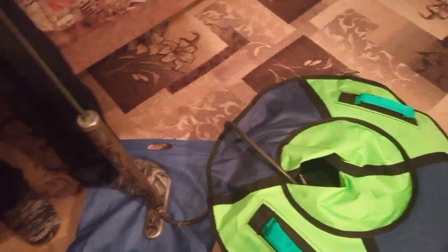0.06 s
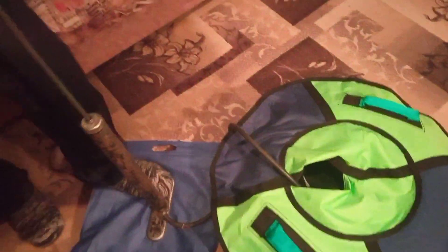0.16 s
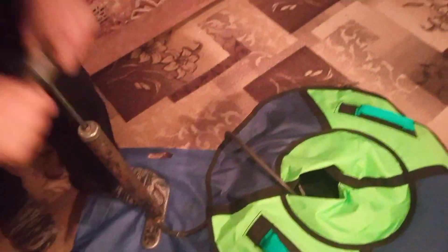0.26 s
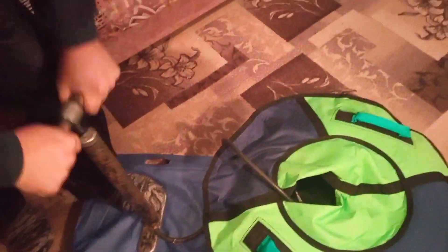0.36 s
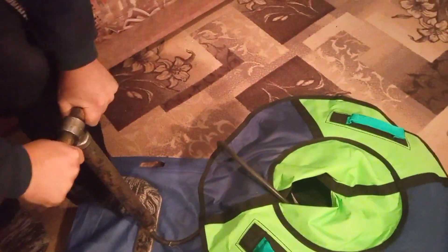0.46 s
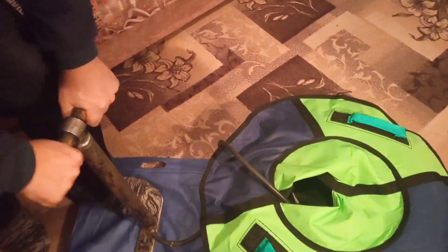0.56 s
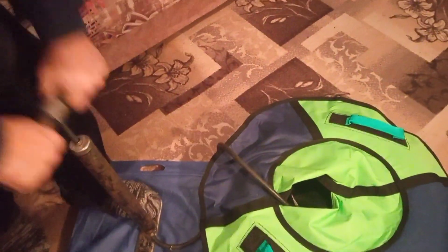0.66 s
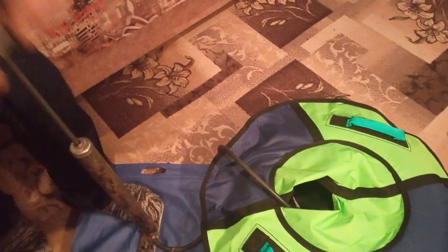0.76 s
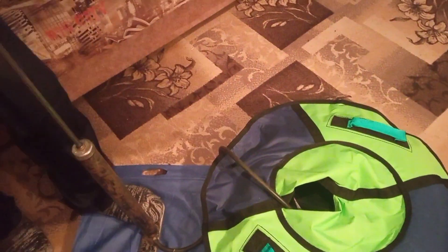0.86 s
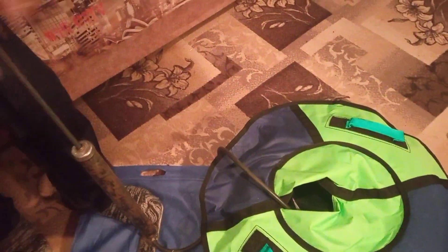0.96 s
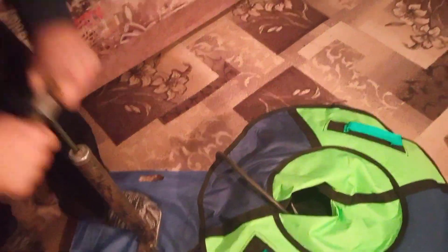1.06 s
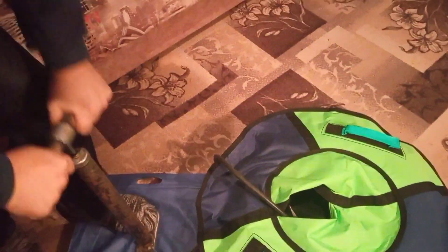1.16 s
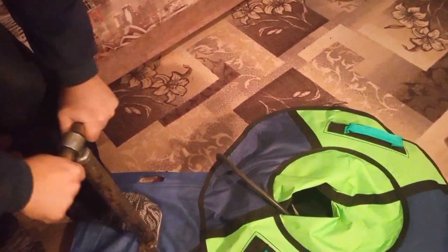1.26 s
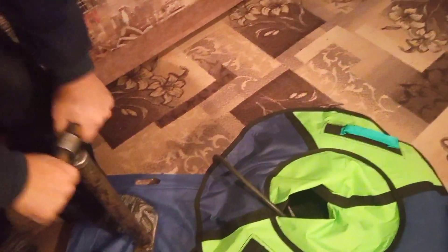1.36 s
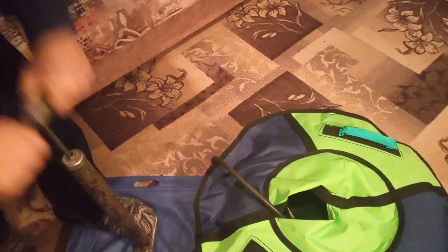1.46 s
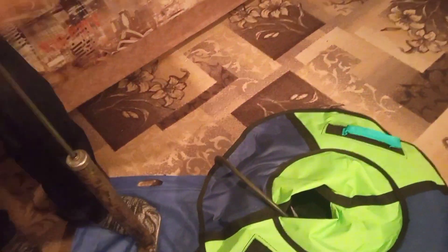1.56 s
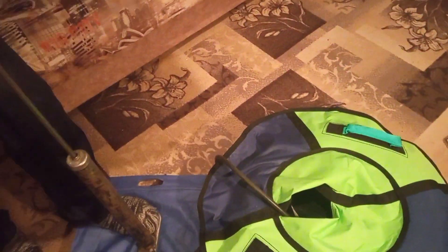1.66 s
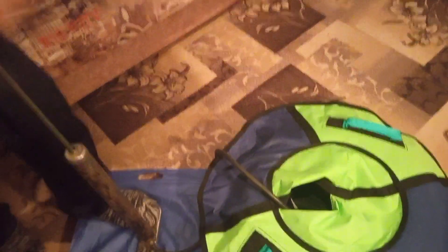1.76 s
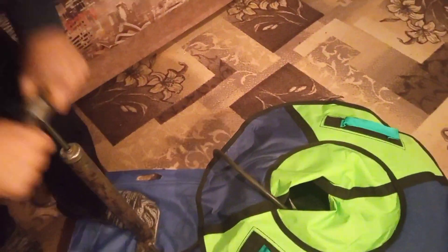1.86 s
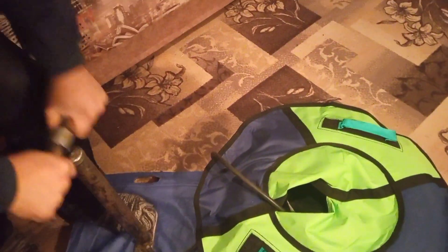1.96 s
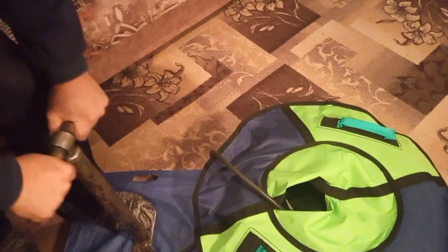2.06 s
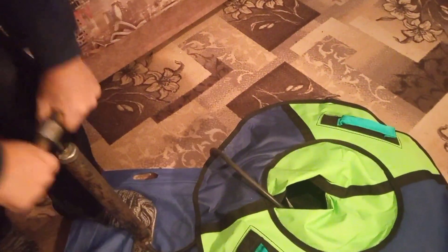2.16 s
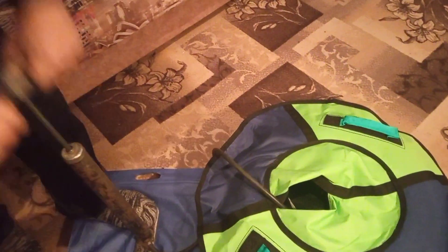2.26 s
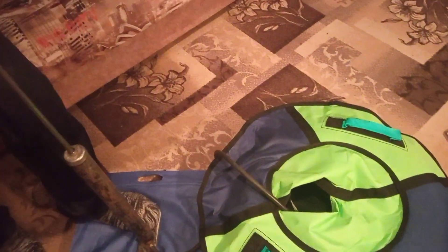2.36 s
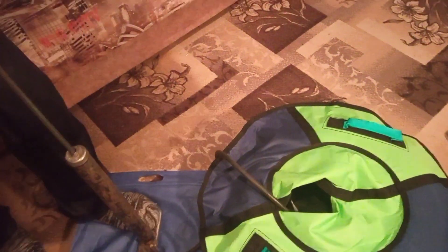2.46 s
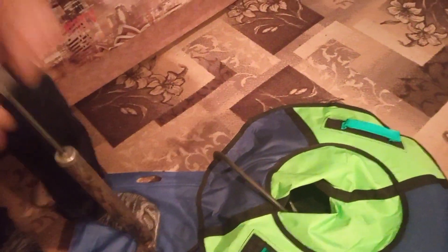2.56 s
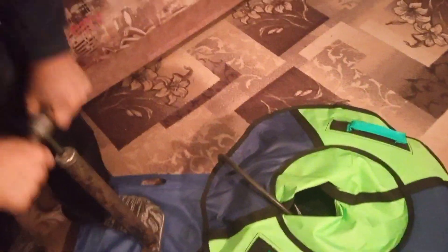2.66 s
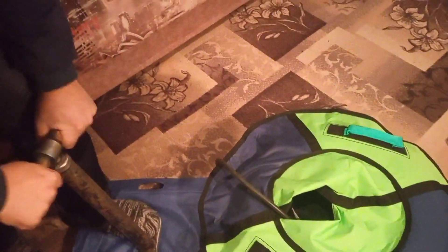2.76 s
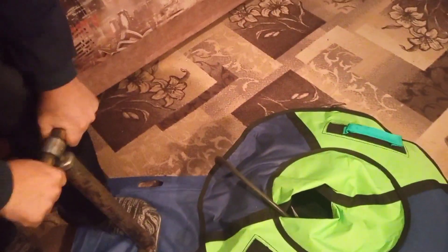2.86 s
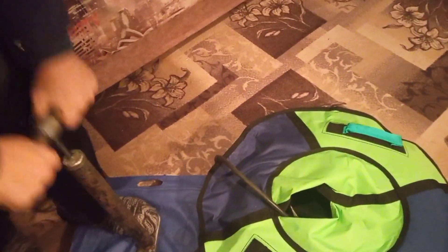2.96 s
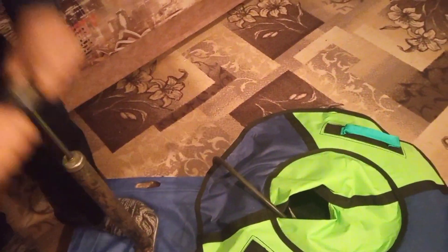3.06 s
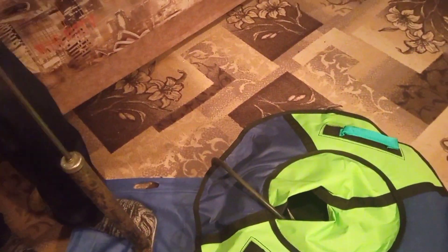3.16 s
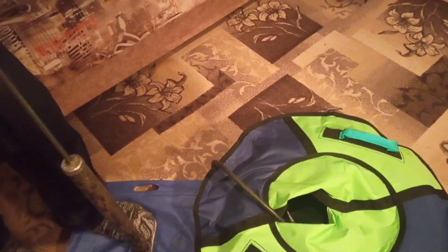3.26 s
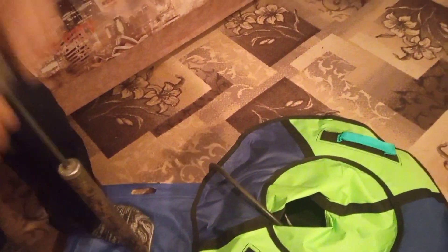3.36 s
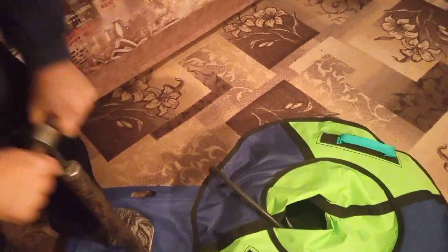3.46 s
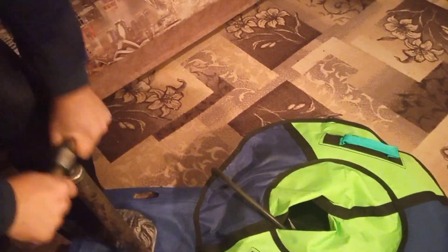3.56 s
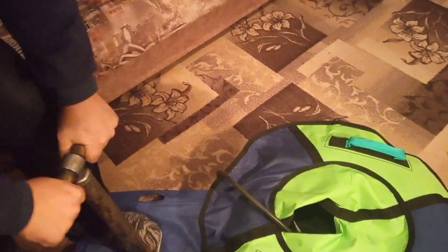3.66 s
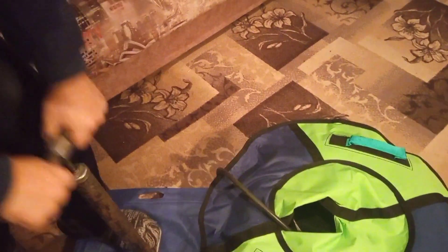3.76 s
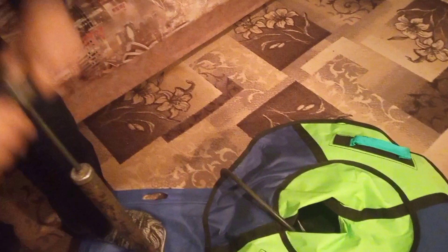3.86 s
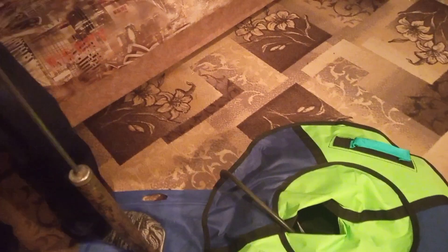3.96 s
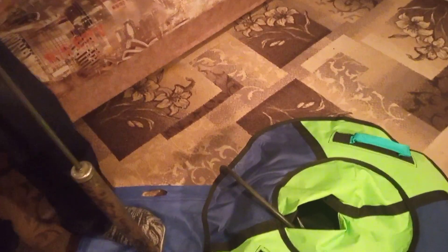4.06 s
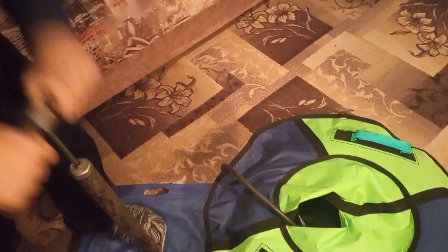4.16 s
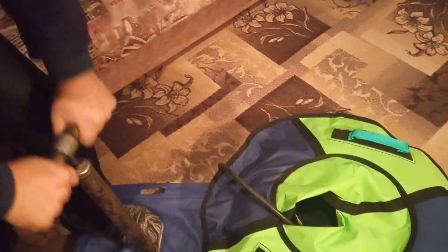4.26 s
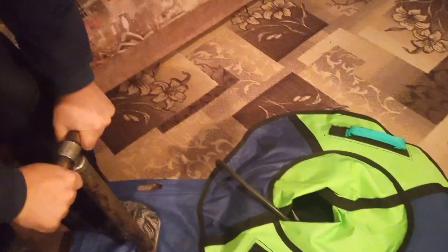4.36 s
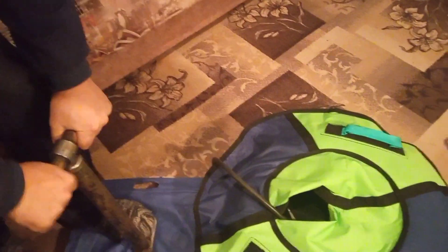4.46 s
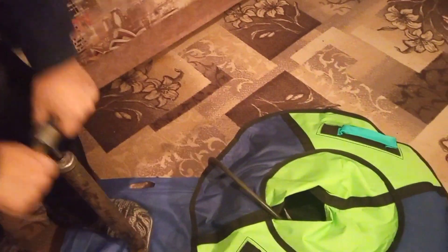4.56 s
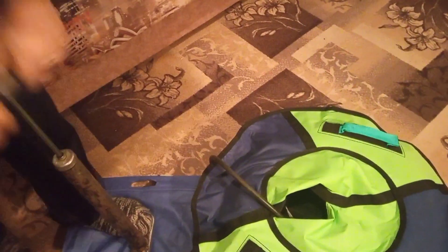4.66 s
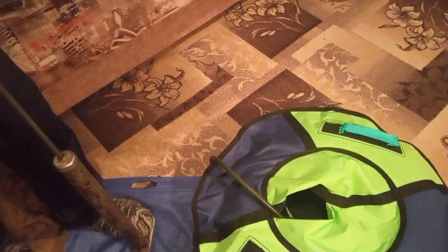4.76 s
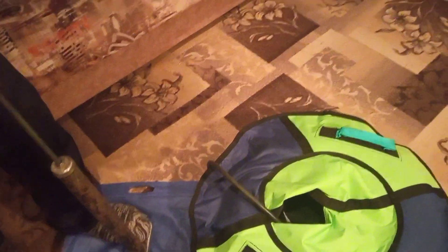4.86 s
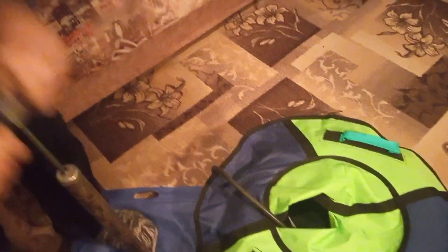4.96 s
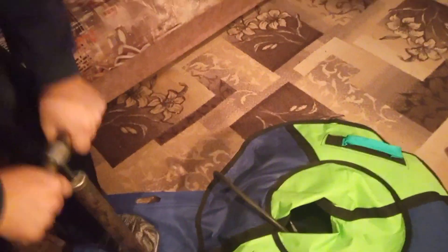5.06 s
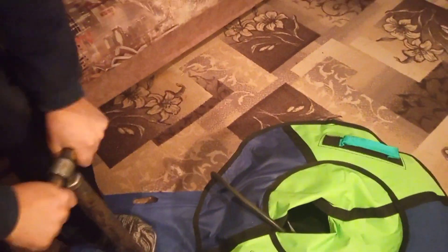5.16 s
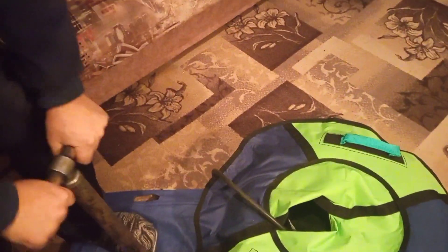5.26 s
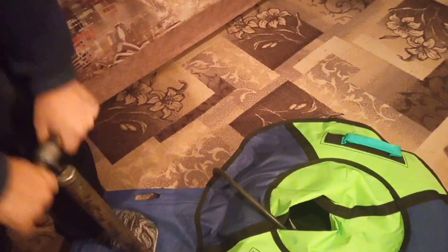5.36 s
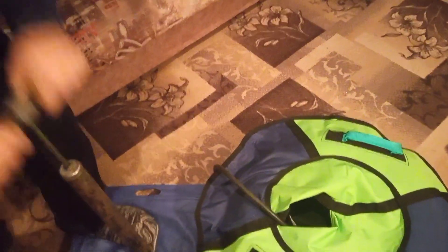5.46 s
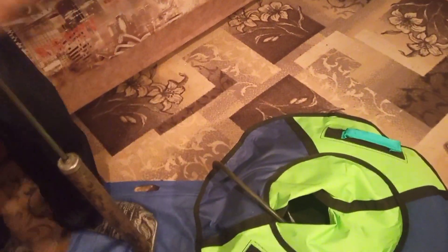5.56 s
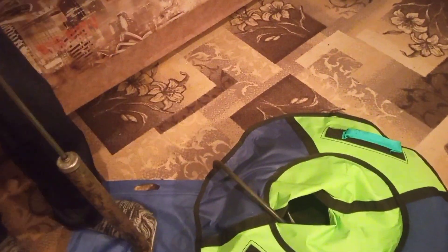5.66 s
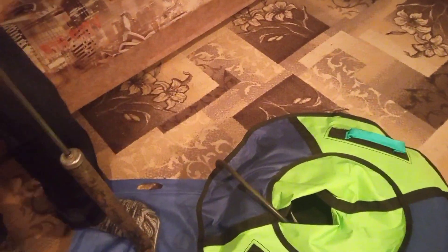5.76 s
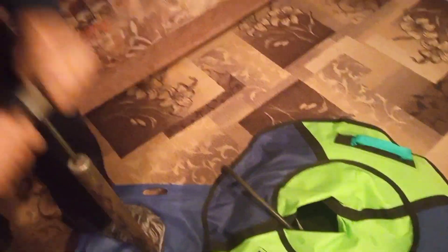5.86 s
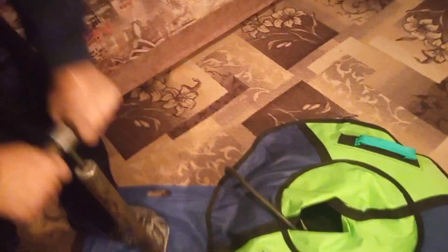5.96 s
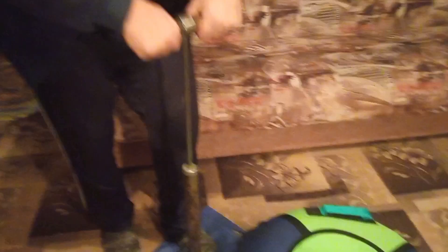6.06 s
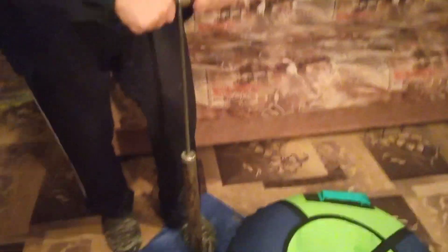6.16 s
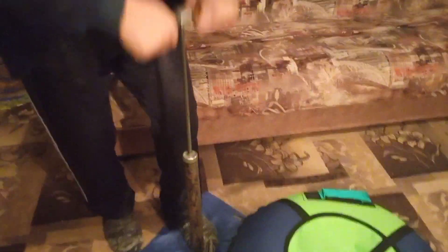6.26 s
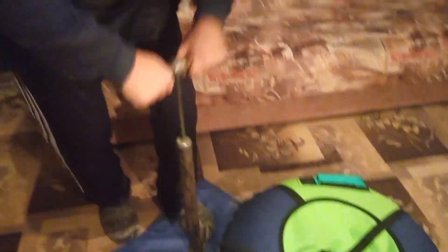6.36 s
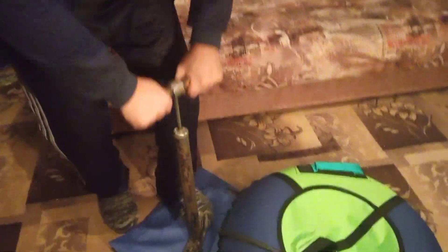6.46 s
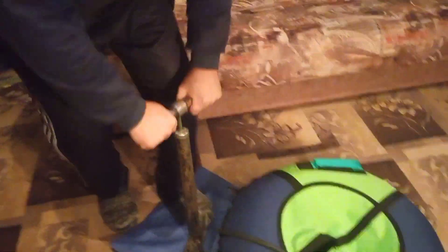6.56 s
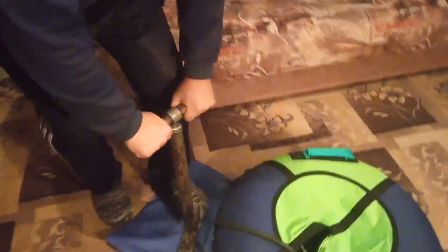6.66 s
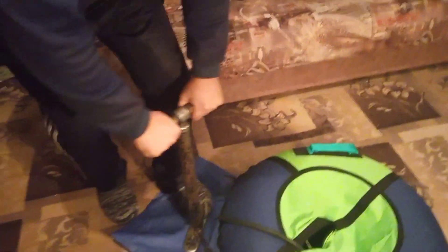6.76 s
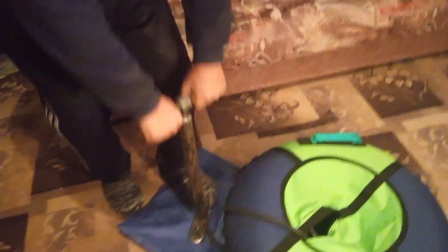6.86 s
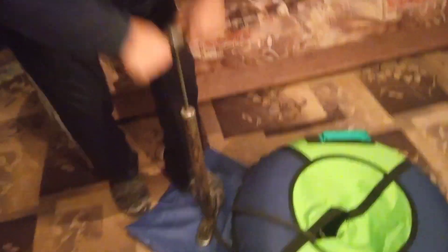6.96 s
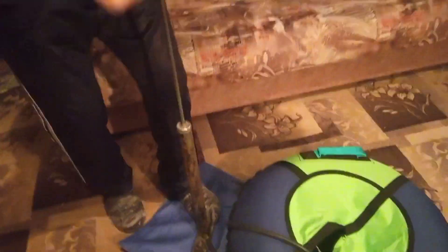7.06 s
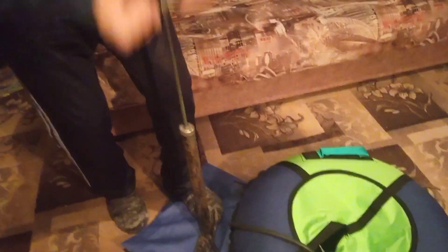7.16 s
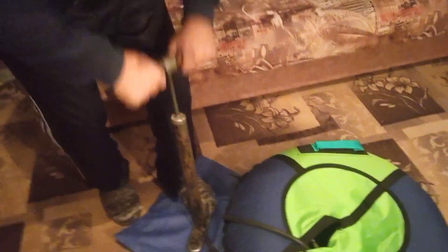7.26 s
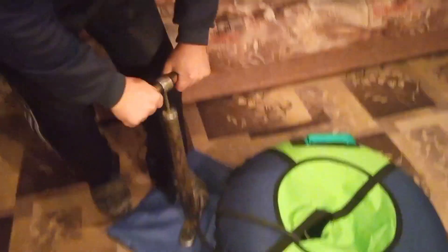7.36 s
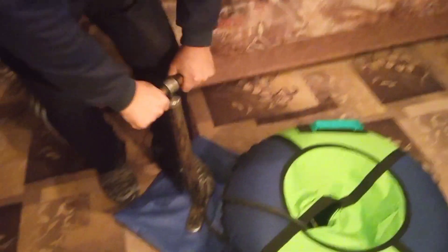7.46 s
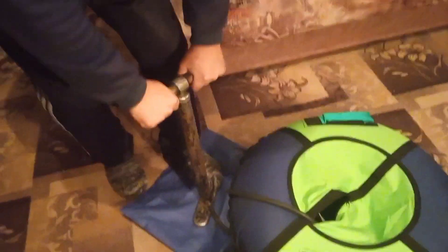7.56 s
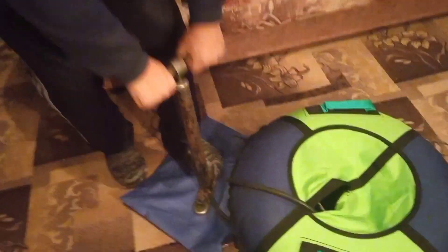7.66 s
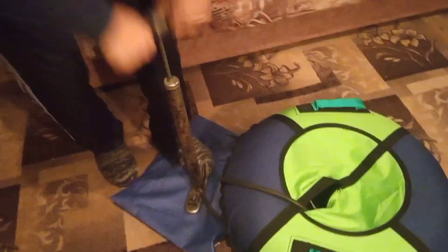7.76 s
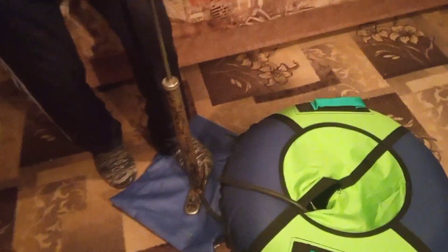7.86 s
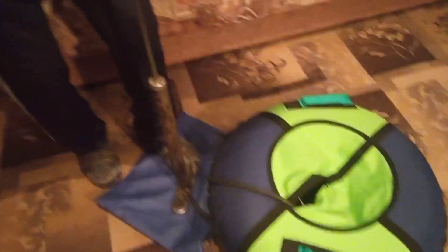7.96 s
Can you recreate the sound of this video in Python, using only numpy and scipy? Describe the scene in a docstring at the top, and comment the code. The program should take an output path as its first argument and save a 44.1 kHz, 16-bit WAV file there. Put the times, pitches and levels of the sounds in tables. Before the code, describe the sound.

A metal floor pump worked in steady strokes indoors, wheezy air rushing, rod clacking, dry seal squeaking, each push landing with a low thud.

```python
"""A steel floor pump inflates a snow tube in a carpeted room, ten strokes at a nearly even pace.
Air, as shaped noise, rushes through the barrel from the start, while the sliding piston rumbles.
The loose rod clacks in its cap: short bursts of noise that ring the barrel. Then the dry seal rasps, as
chopped noise, and squeaks, as unsteady high tones. Each push ends in a thud of fading low tones and noise.
These sounds return stroke after stroke over a quiet background."""
import sys
import numpy as np
from scipy import signal
from scipy.fft import rfft, irfft
from scipy.io import wavfile

SR = 44100
rng = np.random.default_rng(int(sys.argv[2]) if len(sys.argv) > 2 else 0)


def store_pcm(level_fs):
    """Save levels as 16-bit WAV."""
    pcm = np.round(np.clip(level_fs, -1, 1) * 32767).astype(np.int16)
    wavfile.write(sys.argv[1], SR, np.atleast_2d(pcm).T)


N = 354123  # length in samples, about 8 seconds

# All dB columns are relative levels: each sound is balanced once more where it is made.

# Up strokes, drawing air in. Each row: start in seconds, length in seconds, rush in dB, hiss in dB,
# rumble in dB.
UP_STROKES = [(-.15, 0.45, -42.5, -56.5, -56), (0.64, 0.47, -49, -57, -60), (1.437, 0.47, -47, -70, -64),
              (2.18, 0.45, -43, -53.5, -55.5), (2.99, 0.43, -43.5, -65, -55.5),
              (3.738, 0.62, -46.5, -62, -54.5), (4.48, 0.52, -45.5, -60, -77), (5.29, 0.48, -53, -62, -75),
              (6.805, 0.47, -42, -62, -49.5), (7.715, 0.41, -43.5, -59, -57.5)]
# Down strokes, each ending in a thud. Each row: landing time in seconds, push length in seconds,
# rush in dB, hiss in dB, rumble in dB, boom in dB, knock in dB, clank in dB.
DOWN_STROKES = [(0.539, .38, -47, -49, -52.5, -9.5, -24.5, -21.5),
                (1.356, 0.38, -44, -44.5, -49.5, -13, -31.5, -23.5),
                (2.097, 0.36, -44.5, -45.5, -49.5, -15, -37.5, -28),
                (2.879, 0.46, -48, -46, -52, -17.5, -32.5, -25),
                (3.668, 0.37, -43, -46.5, -52, -10.5, -23, -23.5),
                (4.456, 0.39, -42, -45, -52, -12, -29.5, -40),
                (5.256, 0.36, -45, -47, -51.5, -11.5, -26, -26),
                (6.01, 0.19, -59.5, -69, -62, -28, -42.5, -24.5),
                (6.712, 0.43, -50.5, -50.5, -56, -14.5, -25.5, -22),
                (7.57, 0.47, -42, -46.5, -53.5, -18.5, -31, -28.5)]
# How each sound swells within a stroke. Each holds: loudest point as a share of the stroke,
# sag by the end in dB, time constant of the dying away in seconds.
PUSH_RUSH = (0.29, 9.3, 0.14)  # air rushes while the piston runs freely
PUSH_HISS = (0.86, 5, 0.11)  # it hisses past the seal as pressure builds
PUSH_RUMBLE = (.7, 0.5, 0.032)  # the barrel shakes most under full load
LIFT_AIR = (0.43, 12, 0.035)
LIFT_RUMBLE = (0.16, 9.3, 0.05)
# Rod and valve clacks. Each row: start in seconds, crack level in dB, barrel ring in dB.
CLACKS = [(0.0194, -31, -22.5), (0.1086, -24, -34), (0.199, -36.5, -26), (0.8215, -30.5, -18),
          (.956, -23.5, -30.5), (1.4503, -32, -23), (1.6136, -32.5, -31), (1.7445, -25.5, -30),
          (1.961, -26.5, -48), (2.4231, -27, -22), (2.503, -24.5, -33), (3.114, -22, -19),
          (3.194, -40, -21), (3.2875, -24, -29.5), (3.4011, -29.5, -33), (3.7879, -26, -20.5),
          (4.0971, -29, -23), (4.1943, -26.5, -38), (4.2458, -24.5, -19.5), (4.668, -33.5, -27.5),
          (4.9185, -36.5, -42), (5.504, -32, -25), (6.3778, -28, -36), (6.859, -47, -25), (7, -35.5, -32),
          (7.1543, -26, -29), (7.224, -32.5, -48), (7.7465, -37.5, -24), (7.987, -34, -56)]
# The seal chatters without a pitch. Each row: start in seconds, length in seconds, swell time in seconds,
# scrape level in dB, hiss in dB.
RASPS = [(.219, 0.11, 0.023, -36, -37), (0.732, 0.14, 0.02, -42, -70), (1.05, 0.076, 0.023, -41.5, -41.5),
         (1.541, 0.095, 0.017, -41, -45.5), (1.791, 0.07, 0.037, -36, -38),
         (2.272, 0.043, 0.0067, -29.5, -26), (2.573, 0.095, 0.023, -36, -51),
         (2.97, .083, 0.0033, -28.5, -34.5), (3.398, 0.09, 0.0057, -40.5, -38.5),
         (3.556, 0.033, .01, -47, -41.5), (4.185, 0.018, 0.061, -16, -58.5),
         (4.358, 0.041, 0.02, -43.5, -51.5), (4.968, 0.092, 0.013, -39, -47),
         (5.108, 0.064, 0.0043, -46.5, -27.5), (7.81, 0.049, 0.016, -43.5, -41.5)]
# Seal squeaks. Each row: start in seconds, length in seconds, basic pitch in Hz, level in dB,
# roughness from 0 to 1.
SQUEAKS = [ (0.363, 0.043, 6590, -34, 0.28), (.436, 0.0098, 6660, -30.5, 0),
           (0.449, 0.066, 10340, -39, 0.3), (0.516, 0.026, 6646, -32, .12),
           (1.183, 0.0088, 6710, -33, 0.03), (1.248, 0.037, 4770, -37.5, 0.45),
           (1.249, 0.016, 6360, -37, 0.69), (1.252, 0.0086, 9300, -29, 0.63),
           (1.271, 0.034, 10160, -40.5, .1), (1.352, 0.0064, 11420, -37.5, 0.17),
           (2, 0.0081, 6860, -41, 0.2), (2.022, 0.012, 10280, -39.5, 0.25),
           (2.023, 0.029, 6640, -34.5, 0.15), (2.028, 0.024, 11620, -37, .05),
           (2.069, 0.039, 6440, -30, 0.26), (2.728, .011, 4790, -39, 0.5), (2.753, 0.026, 6610, -30.5, .2),
           (2.762, 0.049, 6480, -37.5, 0.1), (2.78, 0.013, 11540, -34.5, 0.08),
           (3.557, 0.011, 6230, -27.5, 0.54), (3.563, 0.071, 6090, -32.5, 0.57),
           (3.824, 0.07, 4750, -45.5, 0.28), (4.283, 0.017, 6490, -32, 0.13),
           (4.344, 0.039, 5845, -29, 0.59), (4.396, 0.028, 6290, -29, 0.45),
           (4.439, 0.021, 6467, -26.5, 0.22), (5.125, 0.064, 6330, -34.5, .95),
           (5.241, 0.029, 6450, -40.5, 0.2), (5.424, 0.0087, 4560, -46.5, 0.11),
           (5.838, 0.048, 4630, -42.5, 0.37), (5.882, 0.064, 4600, -40.5, 0.42),
           (5.984, 0.011, 6290, -28.5, 0.51), (6.364, 0.054, 4450, -45.5, 0.44),
           (6.403, 0.022, 6710, -33.5, 0.25), (6.452, 0.0077, 6630, -26.5, 0.16),
           (6.512, 0.014, 6670, -28, 0.18), (6.636, .015, 7390, -40.5, .25),
           (6.687, 0.038, 6583, -29.5, 0.31), (7.349, .028, 6870, -41, 0.16),
           (7.372, 0.039, 11780, -48, 0.16), (7.387, .008, 7230, -25.5, 0.26),
           (7.445, 0.016, 11700, -39.5, .13), (7.457, 0.024, 6850, -33.5, 0),
           (7.473, .024, 6290, -31, 0.34), (7.474, 0.067, 7340, -30.5, 0.06),
           (7.534, 0.011, 11970, -40, .23), (7.548, 0.0385, 6485, -30, 0.01),
           (7.799, 0.037, 4750, -40, 0.11)]

# Resonances of the steel barrel. Each row: pitch in Hz, width in Hz, level in dB.
BARREL = [(1827, 43, -7), (2343, 125, 2), (2420, 106, 1), (2580, 130, 7), (2781, 34, 5), (3178, 170, -2),
          (3512, 148, 0.5), (4130, 25, -1.5), (4330, 57, 4.5), (4800, 27, -2.5), (4840, 190, -13.5),
          (5420, 20, -47)]
# Other modes of the seal's lip, which a rough slip sets off together. Each row: pitch in Hz,
# width in Hz before widening, level in dB.
SEAL_LIP = [(3160, 150, -13), (4690, 170, -5), (5350, 1200, -9), (6620, 270, -2), (7000, 200, -7.5),
            (9500, 780, -10), (10700, 230, -7.5), (11600, 500, -8.5)]
# Modes of the pump standing on the floor, low ones and then higher ones. Each row: basic pitch in Hz,
# level in dB, time to fade by 60 dB in seconds.
BODY = [(92.6, -15, 0.43), (153.3, -9.5, 0.17), (198.2, -11, 0.42), (234.3, -4, 0.27), (285.8, -4.5, 0.24),
        (366, -25, 0.11)]
KNOCK = [(413, -14, 0.19), (484.8, 11.5, 0.2), (548.5, 4, 0.14), (585, 4, 0.18), (660, -0.5, 0.21),
         (730, -49, 0.13)]

# Noise colours. Each row: frequency in Hz, level at that frequency in dB.
RUSH = [(400, 4.5), (700, 8), (1300, 1.5), (2000, 4), (2600, -3.5), (3300, -2.5), (4500, 1.5), (5600, -8),
        (7000, -17), (10000, -48.5), (15000, -41.5)]  # air in the barrel
HISS = [(2650, -9.5), (4500, -4), (5330, -6), (6200, 1), (8140, -7.5), (9270, -2.5), (11200, -13.5),
        (12600, -19.5), (15100, -9.5), (16200, -32), (16500, -68.5)]  # air past the cap and seal
RUMBLE = [(30, -28), (60, -20), (100, -9), (150, -4.5), (230, -0.5), (320, -7), (420, -4), (620, -12),
          (900, -21.5), (1500, -19.5)]  # the sliding piston
TICK = [(1470, -45), (2500, -31), (3350, -16), (4280, 3), (5510, 2.5), (9350, 4), (13000, -7), (15200, -4),
        (16100, -10.5), (16500, -43)]  # bright hits and grit
RASP = [(500, -14), (1000, -9.5), (1400, -9.5), (1900, -4.5), (2500, -8.5), (3300, -3.5), (4500, -6),
        (5600, -6.5), (7000, -11), (9500, -18.5), (13000, -22)]  # the scraping seal
THUMP = [(45, -28.5), (70, -27.5), (95, -10.5), (130, -11), (170, -5.5), (230, -2), (290, -5), (350, -6),
         (600, -19.5)]  # the floor's many weak modes
CLUNK = [(330, -10), (400, 5), (470, -12.5), (600, 2), (760, -1.5), (900, -9.5), (1200, -12.5), (1450, -20),
         (1900, -19)]  # the pump's many weak modes
QUIET = [(18, -83), (30, -34.5), (106, 13.5), (374, -21), (962, -88), (1390, -48.5), (2410, 8), (3490, 4.5),
         (6380, -37), (16000, -45.5)]  # the quiet background

QUIET_DB = -69  # background level
EDDY_DB = 6.5  # how far the eddies push each barrel resonance up and down
GRIT_PER_S, GRIT_DB = 5, 5  # faint ticks of the dry rod; their level against the airflow
SQUEAK_SAG = 0.047  # share of the pitch that a fully rough squeak falls
SQUEAK_WAVER = 0.0056  # slow unsteadiness, as a share of the pitch
SQUEAK_RISE_S, SQUEAK_SLOW_RISE = 0.0025, 0.033  # attack, plus this share of the squeak's length
TOP_HZ = 16300  # nothing much is heard above this


def undb(db):
    """Turn decibels into a gain."""
    return 10 ** (np.asarray(db) / 20)


def unit(x):
    """Scale to an rms level of 1."""
    return x / np.sqrt(np.mean(x ** 2) + 1e-20)


def add(out, s, x):
    """Mix x into out from time s on."""
    i = max(int(s * SR), 0)
    out[i:i + len(x)] += x[:max(len(out) - i, 0)]


def noise(colour, size=N):
    """Noise of rms 1 with the given colour, fading beyond both ends of its table."""
    hz, db = np.transpose(colour)
    f = np.fft.rfftfreq(size, 1 / SR) + 1
    gain = undb(np.interp(np.log(f), np.log(hz), db))
    skirts = np.minimum(f / hz[0], 1) ** 2 * np.minimum(hz[-1] / f, 1) ** 4
    return unit(irfft(rfft(rng.standard_normal(size)) * gain * skirts, size))


def wander(rate, size=N):
    """A smooth random curve of rms 1 that changes about rate times a second."""
    f = np.fft.rfftfreq(size, 1 / SR)
    return unit(irfft(rfft(rng.standard_normal(size)) / (1 + (f / rate) ** 4), size))


def resonate(x, hz, width):
    """One resonance, gain 1 at its centre."""
    return signal.lfilter(*signal.iirpeak(hz, hz / width, SR), x)


def barrel(x):
    """Pass a sound through the resonances of the steel tube."""
    return sum(undb(db) * resonate(x, hz, width) for hz, width, db in BARREL)


def room(x, t60, wet_db):
    """A small furnished room: dense reflections that start 3 ms late and fade by 60 dB in t60 seconds."""
    t = np.arange(SR // 3) / SR
    tail = rng.standard_normal(len(t)) * undb(-60 * t / t60) * (t > .003)
    return x + undb(wet_db) * signal.fftconvolve(x, tail / np.linalg.norm(tail))[:len(x)]


def gate(t, length, rise, fall):
    """A loudness curve that swells, holds until length seconds and dies away."""
    return (1 - np.exp(-(t / rise) ** 2)) * np.exp(-np.maximum(t - length, 0) / fall)


def ring(modes, t):
    """Damped modes, struck a little differently at every blow."""
    out = 0
    for k, (hz, db, t60) in enumerate(modes):
        size_db, detune = rng.standard_normal(2)
        loudness = undb(db + 1.5 * size_db - 60 * t / t60)
        sign = (-1) ** k  # neighbouring modes start in opposite directions
        out = out + sign * loudness * np.sin(2 * np.pi * hz * (1 + .008 * detune) * t)
    return out


def swell(start, length, shape):
    """One stroke's gain: grows to its loudest point, sags to the end of the stroke, then dies away."""
    peak, sag_db, release_s = shape
    peak = np.clip(peak, .05, .95)
    t = np.arange(N) / SR - start
    rise = np.sin(np.pi / 2 * np.clip(t / (peak * length), 0, 1)) ** 1.3
    sag = undb(-sag_db * np.clip((t / length - peak) / (1 - peak), 0, 1))
    return rise * sag * np.exp(-np.maximum(t - length, 0) / release_s)


def pumping(push_shape, lift_shape, axis):
    """Gain through all down and up strokes of the rush (axis 0), hiss (1) or rumble (2)."""
    down = sum(undb(levels[axis]) * swell(lands - length, length, push_shape)
               for lands, length, *levels in DOWN_STROKES)
    up = sum(undb(levels[axis]) * swell(s, length, lift_shape) for s, length, *levels in UP_STROKES)
    return np.hypot(down, up)


def background():
    """A steady, very soft noise lies under everything."""
    return noise(QUIET) * undb(QUIET_DB)


def air():
    """Turbulent rush and hiss through the cap; eddies favour changing barrel resonances; the rod adds grit."""
    t = np.arange(N) / SR
    flow = pumping(PUSH_RUSH, LIFT_AIR, axis=0)
    flutter = undb(1.3 * wander(14) + 1.2 * wander(60) + 1.5 * wander(900))
    rush = noise(RUSH) * flow * undb(-5.5) * flutter
    hiss = noise(HISS) * pumping(PUSH_HISS, LIFT_AIR, axis=1) * undb(1.0) * flutter

    # each resonance gets its own random level curve, about 35 points a second
    eddies = rng.standard_normal((len(BARREL), 280))
    eddy_s = np.linspace(0, t[-1], eddies.shape[1])
    ringing = np.zeros(N)
    for (hz, width, db), eddy in zip(BARREL, eddies):
        eddy_gain = undb(db + EDDY_DB * np.interp(t, eddy_s, eddy))
        ringing += resonate(rush * eddy_gain, hz, width)

    # rare random catches, each fading with a time constant of 2 ms
    starts = 1. * (rng.random(N) < GRIT_PER_S / SR)
    catches = signal.lfilter([1], [1, -np.exp(-1 / (0.002 * SR))], starts)
    grit = noise(TICK) * catches * flow * undb(GRIT_DB)
    return 0.68 * rush + 1.02 * ringing + hiss + grit


def slide():
    """The piston rumbles in the barrel; in each push the air's hollow note grows and rises to the thud."""
    t = np.arange(N) / SR
    judder = undb(2.5 * wander(16))
    rumble = noise(RUMBLE) * judder * undb(0.9)
    # climbs from 0 to 1 in each push, then drops back within 60 ms
    push = sum(np.interp(t - lands, [-length, 0, .06], [0, 1, 0]) for lands, length, *_ in DOWN_STROKES)
    hollow_hz = 215 + 45 * push
    hollow = wander(52) * np.sin(2 * np.pi * np.cumsum(hollow_hz) / SR)
    return (rumble + undb(8) * push * hollow) * pumping(PUSH_RUMBLE, LIFT_RUMBLE, axis=2)


def clacks():
    """The rod hits its cap: a bright crack, a short chatter and the ring of the barrel."""
    out, t = np.zeros(N), np.arange(SR // 4) / SR
    attack = 1 - np.exp(-t / 0.00098)
    for s, db, ring_db in CLACKS:
        crack = noise(TICK, size=len(t)) * (np.exp(-t / 0.0041) + 0.27 * np.exp(-t / 0.0095))
        steel = unit(barrel(rng.standard_normal(len(t)))) * np.exp(-t / 0.014)
        add(out, s, (crack * undb(db - 4.0) + steel * undb(ring_db - 12.5)) * attack)
    return out


def rasps():
    """Irregular slips of the seal chop the air into a coarse scrape that rings the barrel."""
    out, t = np.zeros(N), np.arange(SR // 4) / SR
    for s, length, swell_s, db, hiss_db in RASPS:
        shape = gate(t, length, swell_s, 0.01)
        slips = undb(1.6 * wander(340, size=len(t)) + 3.05 * wander(53, size=len(t))) * shape
        # uneven, but each with the strength its smooth shape sets
        slips = slips * np.linalg.norm(shape) / np.linalg.norm(slips) * undb(-4.5)
        scrape = noise(RASP, size=len(t)) * slips * undb(db)
        scrape = .5 * scrape + 1.8 * barrel(scrape)
        hiss = noise(HISS, size=len(t)) * slips * undb(hiss_db)
        add(out, s, scrape + hiss)
    return out


def squeaks():
    """The seal sticks and slips at a high pitch; when rough, it flaps and rings its other modes too."""
    out, t = np.zeros(N), np.arange(SR // 4) / SR
    for s, length, pitch_hz, db, rough in SQUEAKS:
        # a rough squeak starts sharp and drops as the seal grips
        fall = SQUEAK_SAG * (.5 - np.minimum(t / length, 1)) + 0.13 * np.exp(-t / 0.0053)
        slow_waver = SQUEAK_WAVER * wander(45, size=len(t))
        fast_waver = (0.00067 + 0.03 * rough) * wander(610, size=len(t))
        hz = pitch_hz * (1 + rough * fall) * (1 + slow_waver + fast_waver)
        phase = 2 * np.pi * np.cumsum(hz) / SR

        # flapping varies the loudness fast enough to add side tones
        flap_hz = 1400 * (1 + 0.14 * wander(220, size=len(t)))
        flap = np.sin(2 * np.pi * np.cumsum(flap_hz) / SR)
        octave = undb(-23.5 + 10 * rough) * (pitch_hz < SR / 5)  # only lower squeaks get an octave
        tone = np.sin(phase) * (1 + rough ** 2 * flap)
        tone = tone + octave * np.sin(2 * phase) * (1 + 2 * rough ** 2 * flap)

        slips = rng.standard_normal(len(t))
        lip = np.zeros(len(t))
        for mode_hz, width, mode_db in SEAL_LIP:
            once = resonate(slips, mode_hz, 1.3 * width)
            lip += undb(mode_db) * resonate(once, mode_hz, 1.3 * width)
        leak = noise(HISS, size=len(t))  # air leaks past the flapping lip
        tone = tone + 1.16 * rough ** 2 * unit(lip) + 0.1 * rough * leak

        shape = gate(t, length, SQUEAK_RISE_S + SQUEAK_SLOW_RISE * length, 0.0054)
        grip = undb(2.2 * wander(130, size=len(t)))
        heard = room(tone * shape * grip, t60=0.17, wet_db=-1.5)
        add(out, s, unit(heard) * np.sqrt(np.mean(shape ** 2)) * undb(db + 7.5))
    return out


def thuds():
    """The piston lands: the floor booms, the pump knocks on its foot and the steel clanks."""
    out, t = np.zeros(N), np.arange(SR // 2) / SR
    attack = 1 - np.exp(-t / 0.0034)
    weak = np.exp(-t / 0.045)
    for s, *_, boom_db, knock_db, clank_db in DOWN_STROKES:
        # a few strong modes join many weak ones, which are heard as noise
        boom = .29 * ring(BODY, t) + .24 * noise(THUMP, size=len(t)) * weak
        knock = 0.27 * ring(KNOCK, t) + 0.63 * noise(CLUNK, size=len(t)) * weak
        clank = unit(barrel(rng.standard_normal(len(t)))) * np.exp(-t / 0.038)
        clank = clank + 2.5 * noise(TICK, size=len(t)) * np.exp(-t / 0.002)
        low = boom * undb(boom_db) + knock * undb(knock_db)
        add(out, s, low * attack + clank * undb(clank_db - 14))
    return out


def scene():
    """Mix all sounds in the centre; a very faint smear of the treble above 9 kHz differs between channels."""
    mid = squeaks()
    mid = mid + room(rasps() + clacks(), t60=0.17, wet_db=-3)
    mid = mid + room(thuds(), t60=0.21, wet_db=-15.5)
    mid = mid + undb(-1.0) * room(air() + slide(), t60=.14, wet_db=-3.5)
    mid = mid + background()
    treble = signal.sosfilt(signal.butter(6, 9000, "high", fs=SR, output="sos"), mid)
    smear = rng.standard_normal(SR // 200)  # 5 ms of random values
    side = undb(-30) * signal.fftconvolve(treble, smear / np.linalg.norm(smear))[:N]
    return np.array([mid + side, mid - side])


def record(dry):
    """A steep filter cuts the very top of the treble."""
    return signal.sosfilt(signal.ellip(10, .2, 70, TOP_HZ, fs=SR, output="sos"), dry)


dry = scene()
out = record(dry)
store_pcm(out)
```